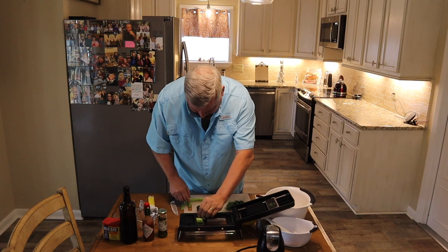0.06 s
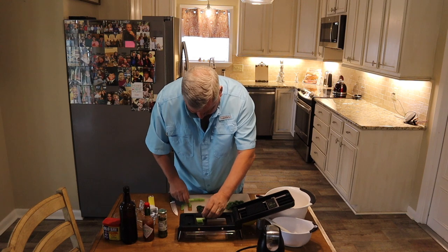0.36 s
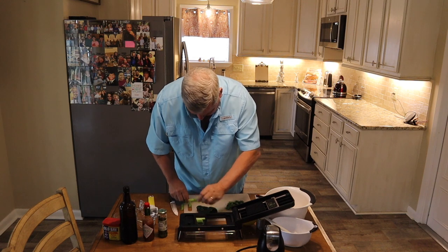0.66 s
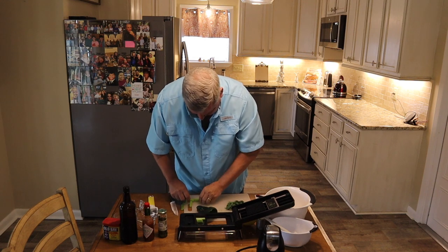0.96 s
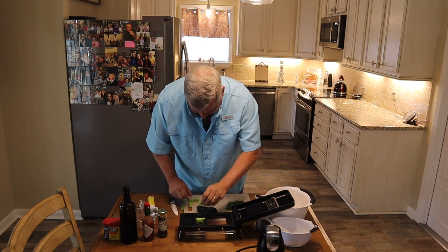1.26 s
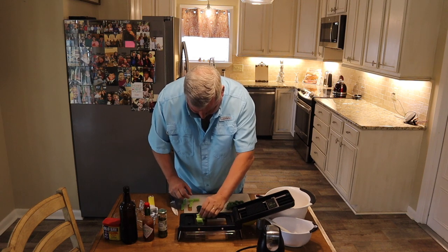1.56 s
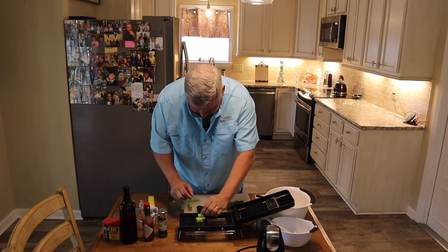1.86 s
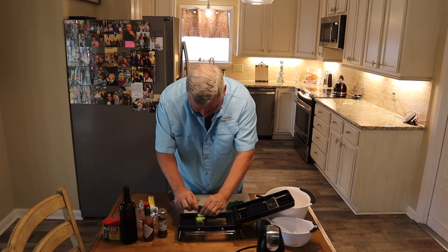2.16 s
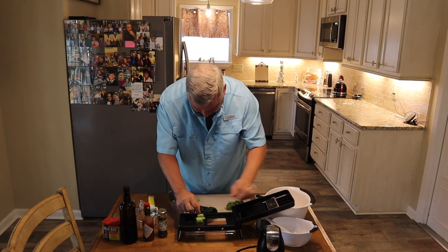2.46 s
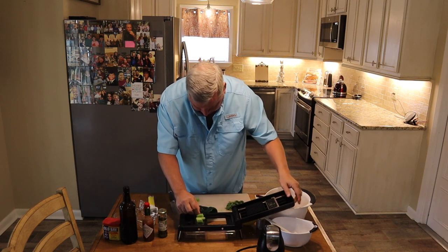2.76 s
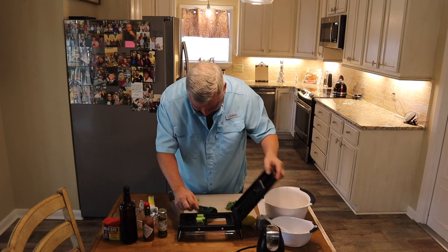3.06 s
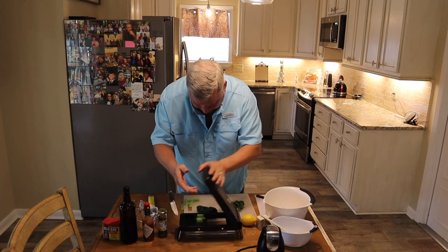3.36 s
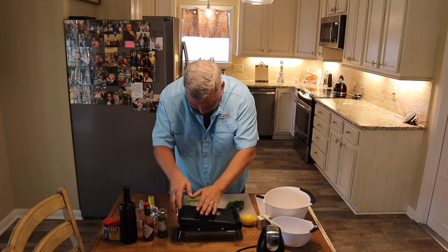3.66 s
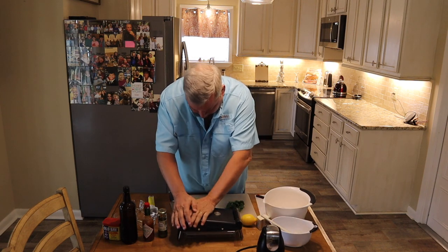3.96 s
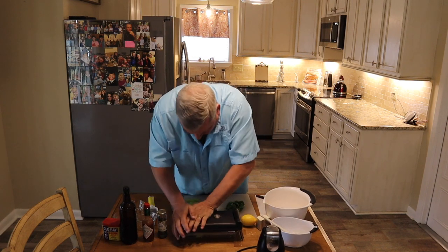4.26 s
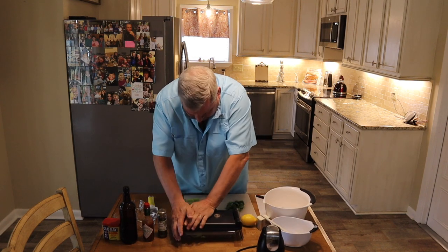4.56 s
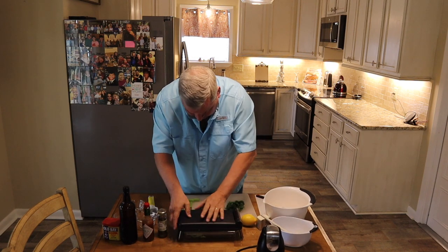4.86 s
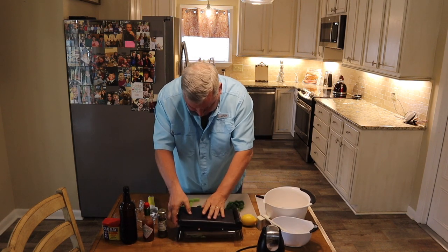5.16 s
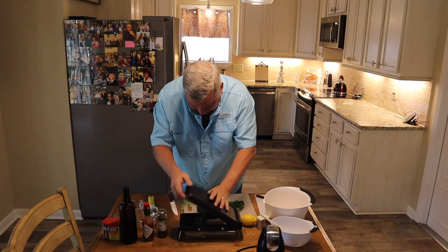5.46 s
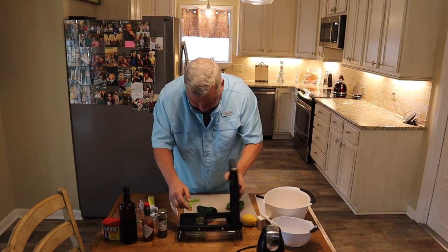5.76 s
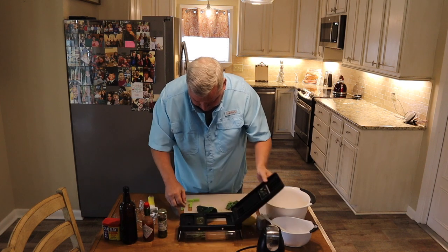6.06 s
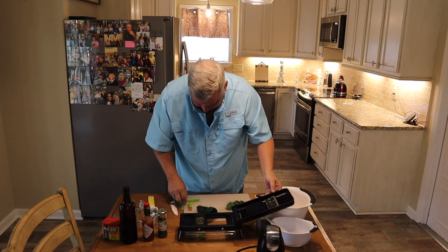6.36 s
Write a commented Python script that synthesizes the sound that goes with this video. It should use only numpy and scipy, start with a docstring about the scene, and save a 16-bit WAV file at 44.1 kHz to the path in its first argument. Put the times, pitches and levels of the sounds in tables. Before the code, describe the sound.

A plastic chopper lid knocks shut, is shoved down with a loud crunch and clatter, then opens again with light knocks.

```python
"""A lever vegetable chopper on a wooden table in a hard-walled kitchen, a couple of metres from the mic.
An appliance hums from the start. Pieces tick onto the blade grid; at about 3 s the hinged lid swings
over, knocking and rubbing, and lands on them. A hard shove crunches them through the blades, and at
4.3 s the lid slams home and the dice tumble into the tray. Then the lid is opened again."""
import sys
import numpy as np
from scipy import signal
from scipy.fft import rfft, irfft
from scipy.io import wavfile
from scipy.ndimage import uniform_filter1d

SR = 44100
rng = np.random.default_rng(int(sys.argv[2]) if len(sys.argv) > 2 else 0)


def store_pcm(level_fs):
    """Save levels as 16-bit WAV."""
    pcm = np.round(np.clip(level_fs, -1, 1) * 32767).astype(np.int16)
    wavfile.write(sys.argv[1], SR, np.atleast_2d(pcm).T)


N = 286514
TIME = np.arange(N) / SR
TAIL = TIME[:SR]  # one second for a sound to ring out

# The closed chopper on the table. Each row: mode in Hz, level in dB, t60 in seconds.
BASE_MODES = [(75.3, -24, 0.79), (128, -19, 0.059), (163.4, -16.5, 0.083), (265, -26.5, 0.26),
              (387.4, -20.5, 0.16), (444, -20.5, 0.044), (546, -22, 0.015), (630, -27.5, 0.067),
              (696, -22.5, 0.036), (800, -29.5, 0.057), (885, -28, 0.18), (960, -27.5, 0.056),
              (1078, -25.5, 0.52), (1310, -31, 0.14), (1515, -26, 0.034), (1580, -34, 0.087),
              (1850, -29, 0.033), (2316, -22, 0.039), (2490, -31, 0.034), (3156, -26, 0.11),
              (3750, -47, 0.027), (3992, -23, 0.021)]
# The free lid. Each row: mode in Hz, level in dB, t60 in seconds.
LID_MODES = [(500, -27, 0.022), (811, -21.5, 0.22), (882, -22, 0.067), (1013, -27, 0.074),
             (1513, -27.5, 0.1), (1813, -15.5, 0.039), (2080, -9.5, 0.013), (2490, -11.5, 0.007),
             (3107, -18, 0.016)]
# Edges in Hz of a blow's four bands: thump, body, clack and snap.
BAND_EDGES_HZ = [55, 250, 1200, 3500, 11000]


def lid_slams():
    """The lid is driven onto the pieces and the base, ringing the whole chopper."""
    # Each row: start in seconds, relative level and hardness in dB, contact in seconds, favoured Hz.
    slams = [(3.731, -12, -1.5, 0.0031, 672), (3.766, -17.5, 2.5, .027, 3120), (4.178, -20.5, 4, .011, 530),
             (4.204, -8.5, 0, 0.0025, 535), (4.286, -25, -9, 0.012, 8800), (4.293, -7, -1.5, 0.0014, 936),
             (4.315, -27, -11, 0.017, 460), (4.360, -22, -19, 0.0023, 485), (4.452, -18, -0.5, 0.019, 1370)]
    return blows(slams, BASE_MODES, gain_db=-5.5, thump_db=-11, clack_db=-7, snap_db=-8,
                 top_hz=9500, favour=1.5, rise_s=.0029, wet_db=1.5)


def table_thuds():
    """The heaviest blows reach the table as slow, soft pushes that ring only the lowest modes."""
    # Each row: start in seconds, level in dB, length of the push in seconds.
    pushes = [(3.731, -23, 0.0044), (3.764, -27.5, 0.0038), (4.204, -26.5, 0.0032), (4.289, -22, .006)]
    out = np.zeros(N + SR)
    for s, level_db, push_s in pushes:
        push = np.sin(np.pi * np.minimum(TAIL / push_s, 1))
        thud = band(ring(push, BASE_MODES), BAND_EDGES_HZ[0], BAND_EDGES_HZ[1])
        start = int(s * SR)
        out[start:start + SR] += at_attack_level(thud, level_db)
    return signal.fftconvolve(out, kitchen(wet_db=-1))[:N]


def blade_crunch():
    """Vegetable flesh splits on the blades, in a burst of tiny cracks each time it gives way."""
    # Each row: start in seconds, level in dB, hold and release in seconds.
    splits = [(3.725, -19.5, .008, 0.013), (3.762, -23, 0.013, 0.049), (3.982, -42.5, 0.028, 0.0088),
              (4.117, -41.5, .04, .01), (4.155, -25.5, 0.03, .04), (4.19, -24.5, 0.073, 0.0077),
              (4.288, -22, 0.037, 0.022), (4.41, -26.5, 0.013, 0.06), (4.74, -47.5, 0.023, 0.1),
              (4.92, -47.5, 0.06, .015)]
    # Colour of the cracks. Each row: frequency in Hz, level in dB.
    spectrum = [(100, -19), (400, -0.5), (1000, 5.5), (2000, 6), (3200, 4), (4500, 5.5), (5600, 3),
                (6800, 6.5), (8600, 6), (10000, 1), (12000, -1.5)]
    return grains(splits, spectrum, BASE_MODES, attack_s=.0013, per_s=2000,
                  spread_db=23.5, grain_s=.00085, wet_db=3.5)


def dice_tumble():
    """Dice land softly in the tray, the first at the slam and the rest after it."""
    # Each row: start in seconds, level in dB, hold and release in seconds.
    falls = [(4.305, -12.5, 0.012, .018), (4.38, -23, 0.075, 0.078)]
    # Colour of the landings. Each row: frequency in Hz, level in dB.
    spectrum = [(60, -34), (150, -7), (300, 2), (530, 21), (750, 13), (1200, 20.5), (1700, 17.5),
                (2500, 4.5), (5000, 5), (12000, -19)]
    return grains(falls, spectrum, BASE_MODES, attack_s=.012, per_s=490,
                  spread_db=14, grain_s=.0024, wet_db=.5)


def lid_knocks():
    """The free lid knocks in its hinge and rings."""
    # Each row: start in seconds, relative level and hardness in dB, contact in seconds, favoured Hz.
    knocks = [(2.949, -43, -18, 0.0064, 800), (3.068, -38.5, -12, 0.013, 460),
              (3.097, -38, -13.5, 0.0058, 265), (3.266, -40.5, -14, 0.0072, 720),
              (3.323, -25, -4, .005, 1740), (3.336, -26.5, -5.5, .007, 1080), (3.476, -35, -7, 0.05, 1850),
              (3.564, -28, -2.5, 0.0049, 275), (4.714, -33, -14, 0.0051, 394), (4.958, -39, -8, 0.02, 765),
              (4.976, -36, -7.5, 0.0035, 3260), (5.603, -39.5, -8.5, 0.0077, 970),
              (5.843, -30.5, -10, 0.0077, 1560), (5.877, -29, -20, 0.00064, 775),
              (5.921, -37.5, -4, 0.0048, 2670), (6.435, -32, -3, 0.0039, 2600)]
    return blows(knocks, LID_MODES, gain_db=-5, thump_db=-8.5, clack_db=1, snap_db=-5.5,
                 top_hz=6500, favour=2, rise_s=.0025, wet_db=2)


def grid_ticks():
    """Small clicks briefly ring the blade grid: pieces being loaded, then one from the closed chopper."""
    # Each row: start in seconds, relative level and hardness in dB, contact in seconds, favoured Hz.
    ticks = [(0.194, -59, 2.5, 0.0049, 8340), (0.997, -48.5, -1.5, 0.015, 6500),
             (1.543, -49, 1, 0.0026, 8450), (1.789, -44.5, 0, .005, 5600), (1.839, -44, -10, 0.0019, 464),
             (1.974, -62.5, 3.5, 0.0077, 3800), (2.097, -57, -1, .0065, 3800), (2.248, -65, 6, 0.01, 7800),
             (5.125, -52, 1.5, 0.07, 2820)]
    # Each row: mode in Hz, level in dB, t60 in seconds.
    grid_modes = [(1400, -20, 0.05), (2250, -10, .04), (3290, -16.5, 0.044), (5600, -24, 0.02),
                  (8450, -13, 0.027)]
    return blows(ticks, grid_modes, gain_db=-7, thump_db=6.5, clack_db=-2, snap_db=5.5,
                 top_hz=10000, favour=1, rise_s=.0013, wet_db=-2.5)


def hinge_rub():
    """Plastic slides in the hinge as the lid tips up, swings shut and is opened."""
    # Each row: start in seconds, level in dB, hold and release in seconds.
    swings = [(3.34, -59, .04, .05), (3.48, -49.5, .21, .02), (5.3, -53.5, 0.71, 0.089)]
    # Colour of the friction. Each row: frequency in Hz, level in dB.
    spectrum = [(100, 11.5), (500, 12.5), (1100, 2), (1400, 2.5), (2000, -3), (3000, -5.5), (4500, -5.5),
                (8700, -0.5), (12000, -10)]
    return grains(swings, spectrum, LID_MODES, attack_s=.007, per_s=990,
                  spread_db=8, grain_s=.0012, wet_db=3)


def appliance_hum(waver_db=4.5):
    """An appliance runs: airflow in a few narrow duct resonances under wavering motor tones."""
    # Each row: centre and width in Hz, level in dB.
    duct_resonances = [(55, 5.3, -60), (217.6, 25, -54), (559.4, 10, -62)]
    # Each row: frequency in Hz, level in dB.
    motor_tones = [(208, -56), (554.3, -57), (1134.5, -69.5), (1184, -82), (2909, -78), (3058, -76)]
    out = np.zeros(N)
    for hz, width_hz, db in duct_resonances:
        airflow = band(rng.standard_normal(N), hz - width_hz / 2, hz + width_hz / 2, order=1)
        out += undb(db) * unit(airflow)
    for hz, db in motor_tones:
        waver = np.interp(TIME, np.linspace(0, TIME[-1], 40), rng.standard_normal(40))
        tone = np.sqrt(2) * np.sin(2 * np.pi * (hz * TIME + rng.random()))
        out += undb(db + waver_db * waver) * tone
    return out


def room_air(level_db=-49.5):
    """Room tone: the steady, low rush of the kitchen's air."""
    # Each row: frequency in Hz, relative spectral density in dB.
    spectrum = [(15, -50), (25, -42), (38, -2), (117, -3.5), (148, -2), (173, -14.5), (207, -0.5),
                (242, -10), (437, -9), (552, -4.5), (678, -10), (1170, -18), (1590, -16.5), (3100, -23.5),
                (11900, -28.5), (15400, -65), (22000, -120)]
    return undb(level_db) * unit(colour(rng.standard_normal(N), spectrum))


def kitchen(wet_db, build_s=.0007, table_s=.0004, table_share=.088):
    """The path to the mic: direct sound, a table bounce, then a diffuse tail whose treble dies sooner."""
    # Each row: frequency in Hz, the room's t60 in seconds.
    decay_times = [(80, 0.16), (210, 0.68), (560, 0.55), (1500, 0.47), (4000, 0.41), (10000, 0.27)]
    noise = rfft(rng.standard_normal(SR))
    octave = np.round(np.log2(np.maximum(np.arange(len(noise)), 64)))
    tail = sum(irfft(noise * (octave == k), SR) * decay(on_log_axis(2 ** k, decay_times))
               for k in np.unique(octave))
    tail *= 1 - np.exp(-TAIL / build_s)  # reflections thicken as they reach more walls
    response = undb(wet_db) * even(tail, width_hz=40)
    response[0] += 1
    response[int(table_s * SR)] += table_share
    return response


def blows(rows, modes, gain_db, thump_db, clack_db, snap_db, top_hz, favour, rise_s, wet_db):
    """Each blow is a brief chatter of contacts that rings an object, heard across the kitchen."""
    out = np.zeros(N + SR)
    for s, level_db, hardness_db, contact_s, favoured_hz in rows:
        pressure = (1 - np.exp(-TAIL / rise_s)) * np.exp(-TAIL / contact_s)
        force = even(rng.standard_normal(SR) * pressure, width_hz=300)
        # Where the blow lands favours one resonance.
        force += favour * band(force, favoured_hz * .9, favoured_hz * 1.1, order=1)
        force = signal.sosfilt(signal.butter(2, top_hz, fs=SR, output="sos"), force)
        sound = signal.fftconvolve(ring(force, modes), kitchen(wet_db))[:SR]
        start = int(s * SR)
        # Bands are set against the body; a harder contact is brighter.
        balance_db = [thump_db, 0, clack_db + hardness_db, snap_db + 2 * hardness_db]
        for db, lo_hz, hi_hz in zip(balance_db, BAND_EDGES_HZ, BAND_EDGES_HZ[1:]):
            part = band(sound, lo_hz, hi_hz, order=4)
            out[start:start + SR] += at_attack_level(part, gain_db + level_db + db)
    return out[:N]


def grains(strokes, spectrum, modes, attack_s, per_s, spread_db, grain_s, wet_db):
    """A shower of tiny uneven impacts rings an object for as long as each stroke lasts."""
    sizes = undb(-spread_db * rng.random(N))
    impacts = (rng.random(N) < per_s / SR) * sizes
    grain_decays = signal.lfilter([1], [1, -np.exp(-1 / (grain_s * SR))], impacts)
    bursts = colour(grain_decays * rng.standard_normal(N), spectrum)
    sound = unit(ring(bursts, modes)) * envelope(strokes, attack_s)
    return signal.fftconvolve(sound, kitchen(wet_db))[:N]


def ring(force, modes):
    """A struck object radiates the contact itself and its modes; dB sets each mode's share of energy."""
    response = np.zeros(SR)
    for hz, db, t60 in modes:
        amplitude = undb(db) * np.sqrt(4 * np.log(1000) / (t60 * SR))
        response += amplitude * np.cos(2 * np.pi * hz * TAIL) * decay(t60)
    return force + signal.fftconvolve(force, response)[:len(force)]


def envelope(strokes, attack_s):
    """Each stroke swells, holds and dies away; overlapping strokes add in power."""
    power = np.zeros(N)
    for s, db, hold_s, release_s in strokes:
        age = np.maximum(TIME - s, 0)
        swell = 1 - np.exp(-age / attack_s)
        fade = np.exp(-np.maximum(age - hold_s, 0) / release_s)
        power += (undb(db) * swell * fade) ** 2
    return np.sqrt(power)


def decay(t60):
    """A fade that falls 60 dB in t60 seconds."""
    return np.exp(-np.log(1000) * TAIL / t60)


def even(x, width_hz):
    """Flatten the broad humps of a noise burst, keeping its fine texture; scale to energy 1."""
    spectrum = rfft(x, 2 * len(x))
    width_bins = max(int(2 * width_hz * len(x) / SR), 1)
    humps = uniform_filter1d(np.abs(spectrum) ** 2, width_bins)
    flat = irfft(spectrum / np.sqrt(np.maximum(humps, 1e-12)))[:len(x)]
    return flat / np.linalg.norm(flat)


def colour(x, points):
    """Shape a sound's spectrum by (Hz, dB) points."""
    gain = undb(on_log_axis(np.fft.rfftfreq(len(x), 1 / SR), points))
    return irfft(rfft(x) * gain, len(x))


def on_log_axis(hz, points):
    """Read (Hz, value) points at any frequency."""
    at, value = np.transpose(points)
    return np.interp(np.log(np.maximum(hz, 1)), np.log(at), value)


def band(x, lo_hz, hi_hz, order=3):
    """Causal band-pass."""
    return signal.sosfilt(signal.butter(order, [lo_hz, hi_hz], "band", fs=SR, output="sos"), x)


def at_attack_level(x, db):
    """Scale a hit so that its first 30 ms stand at this level."""
    return undb(db) * x / np.std(x[:int(.03 * SR)])


def unit(x):
    """Scale to rms 1."""
    return x / np.sqrt(np.mean(x ** 2) + 1e-20)


def undb(db):
    """Decibels to gain."""
    return 10 ** (np.asarray(db) / 20)


def scene():
    """Loading, closing, chopping and reopening over the room tone, on one mono mic."""
    hits = grid_ticks() + lid_knocks() + lid_slams()
    textures = blade_crunch() + dice_tumble() + hinge_rub()
    return (hits + textures + table_thuds() + room_air() + appliance_hum())[None]


def record(dry, ceiling=.86, droop_hz=11300, cutoff_hz=11900):
    """The hardest blows overload the recorder; its response droops at the top and is then cut."""
    overloaded = np.clip(dry, -ceiling, ceiling)
    drooped = signal.sosfilt(signal.butter(6, droop_hz, fs=SR, output="sos"), overloaded)
    return signal.sosfilt(signal.ellip(10, .2, 70, cutoff_hz, fs=SR, output="sos"), drooped)


dry = scene()
out = record(dry)
store_pcm(out)
```